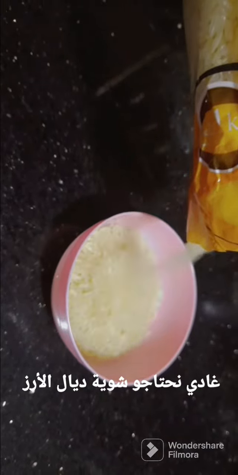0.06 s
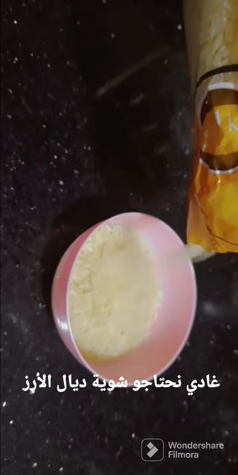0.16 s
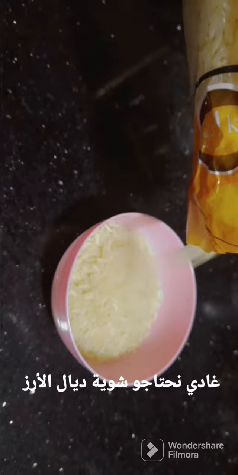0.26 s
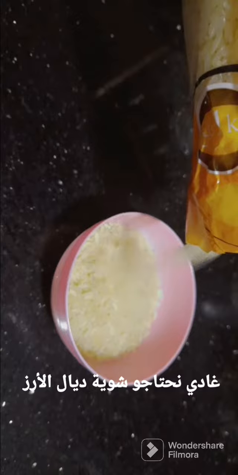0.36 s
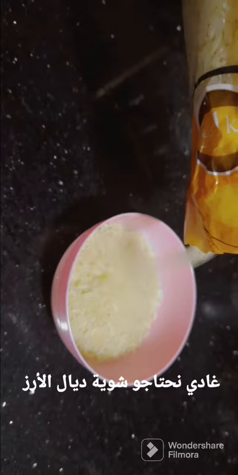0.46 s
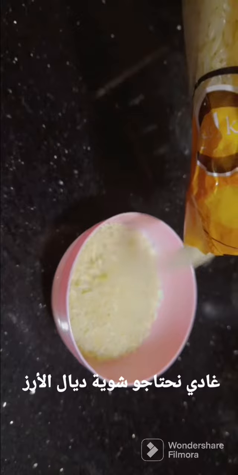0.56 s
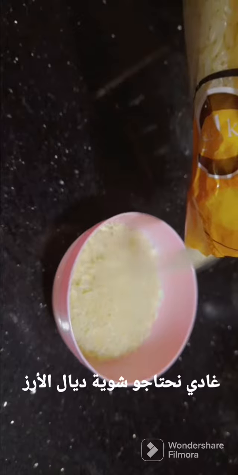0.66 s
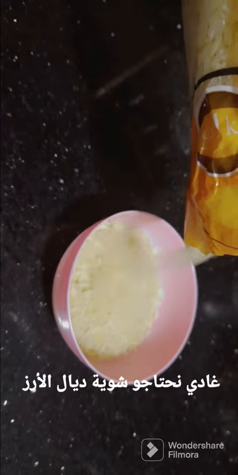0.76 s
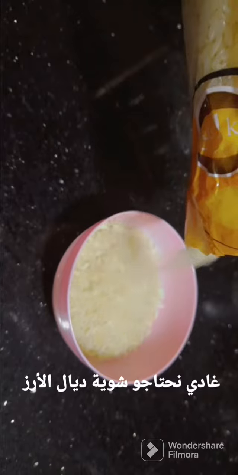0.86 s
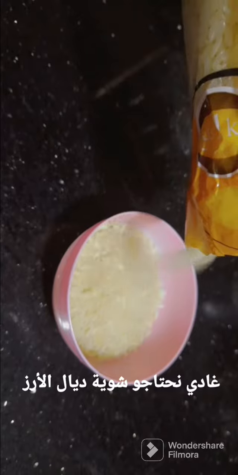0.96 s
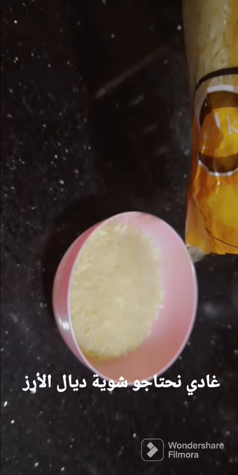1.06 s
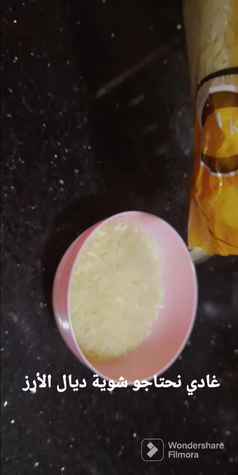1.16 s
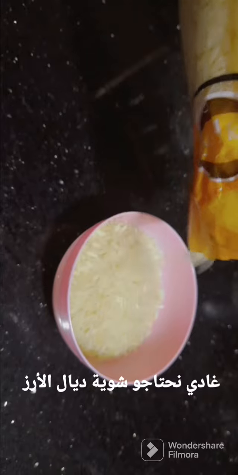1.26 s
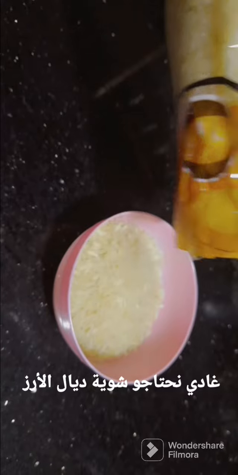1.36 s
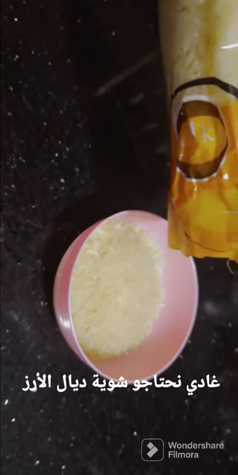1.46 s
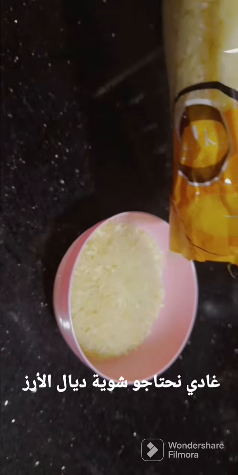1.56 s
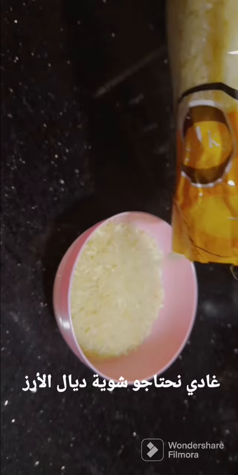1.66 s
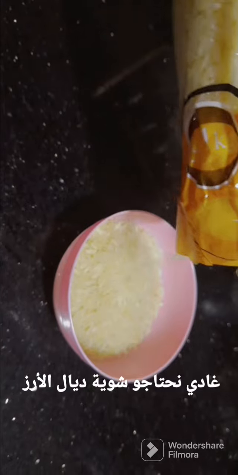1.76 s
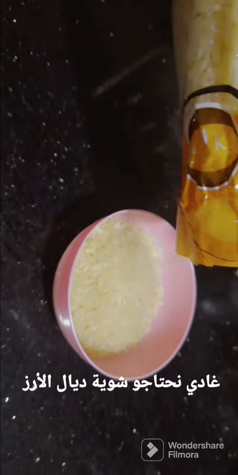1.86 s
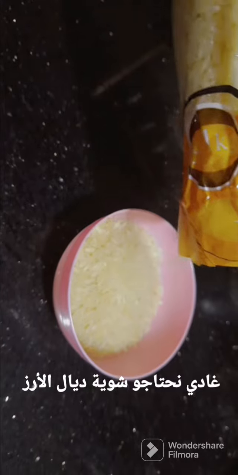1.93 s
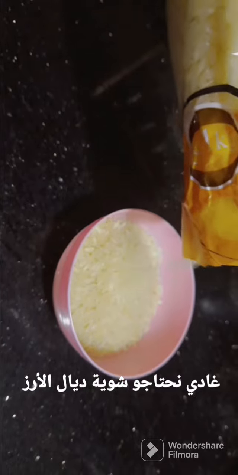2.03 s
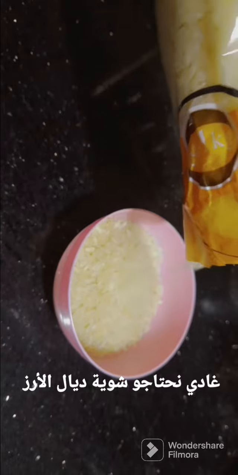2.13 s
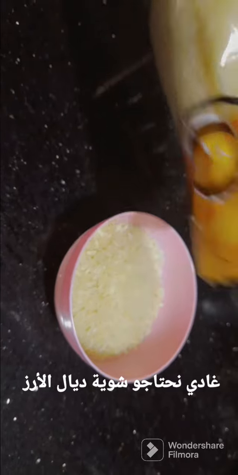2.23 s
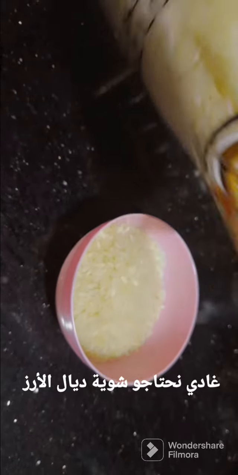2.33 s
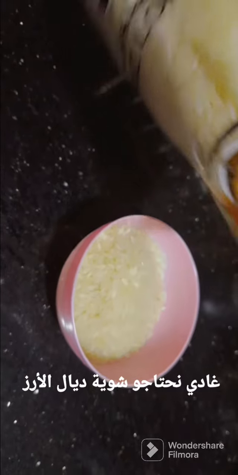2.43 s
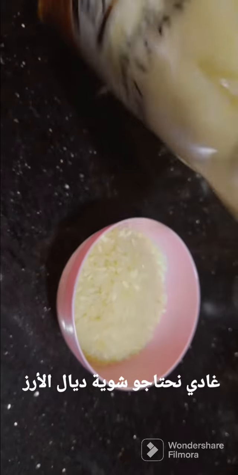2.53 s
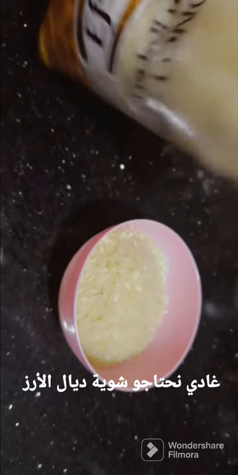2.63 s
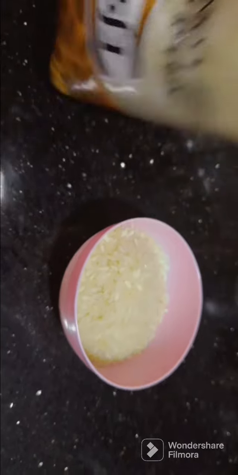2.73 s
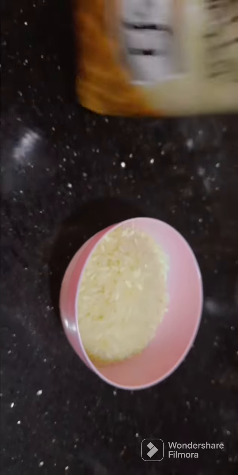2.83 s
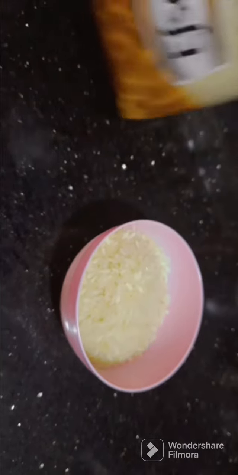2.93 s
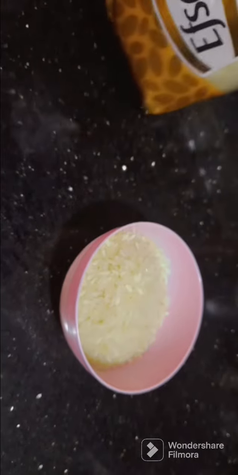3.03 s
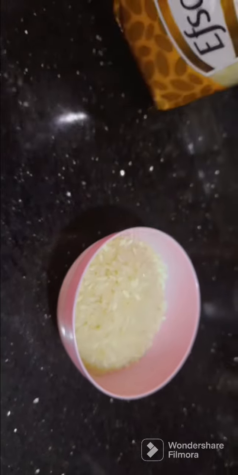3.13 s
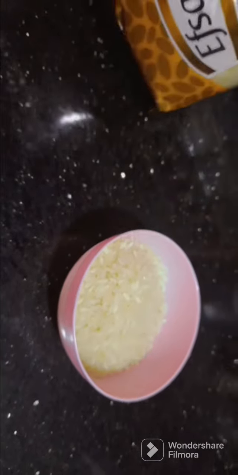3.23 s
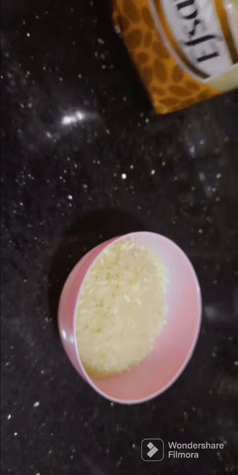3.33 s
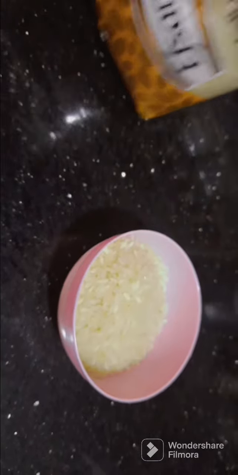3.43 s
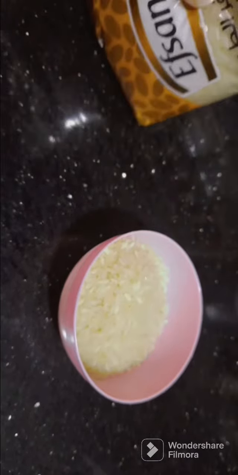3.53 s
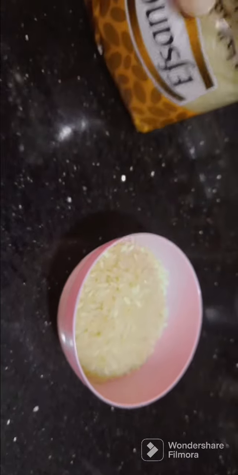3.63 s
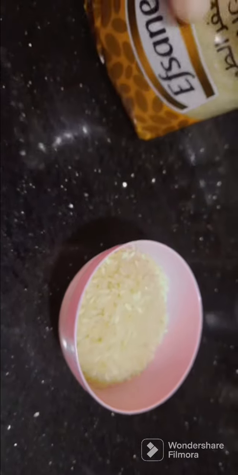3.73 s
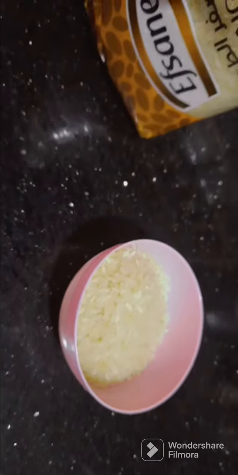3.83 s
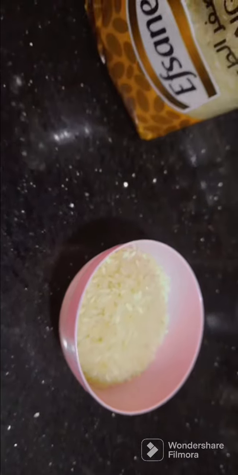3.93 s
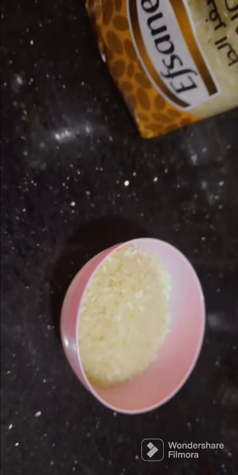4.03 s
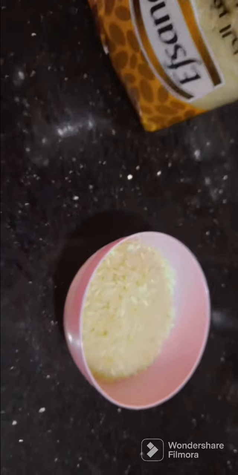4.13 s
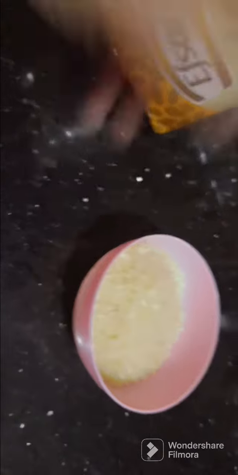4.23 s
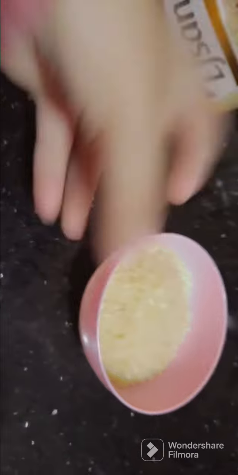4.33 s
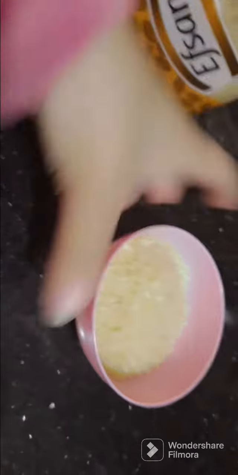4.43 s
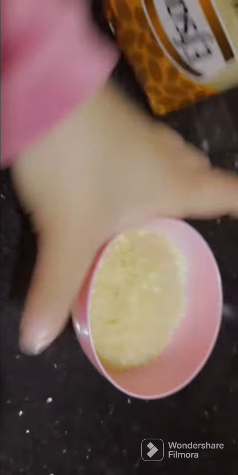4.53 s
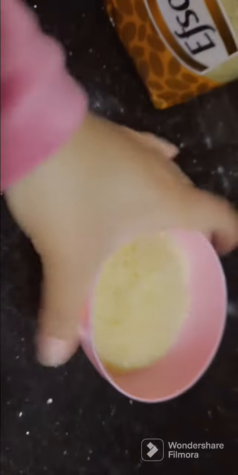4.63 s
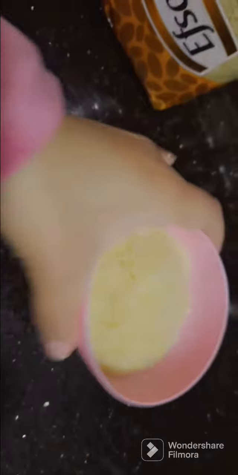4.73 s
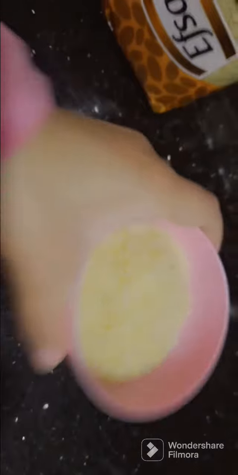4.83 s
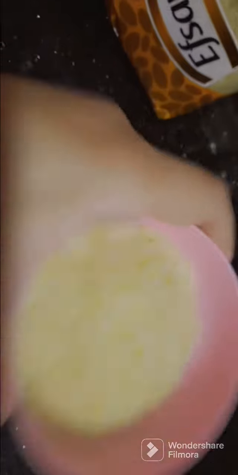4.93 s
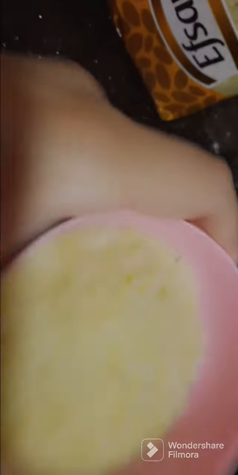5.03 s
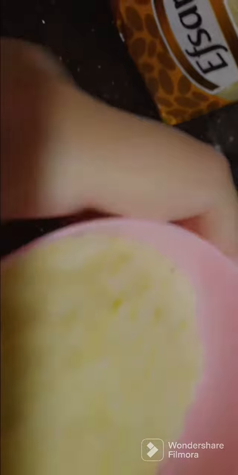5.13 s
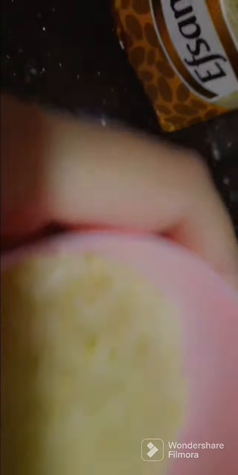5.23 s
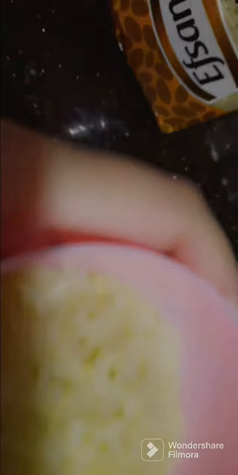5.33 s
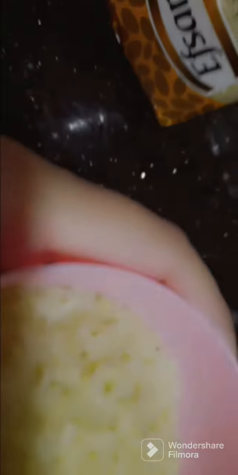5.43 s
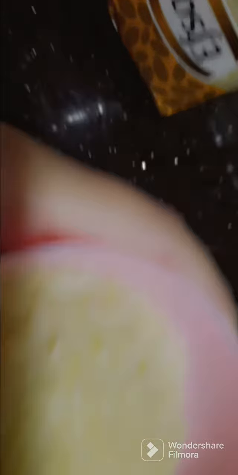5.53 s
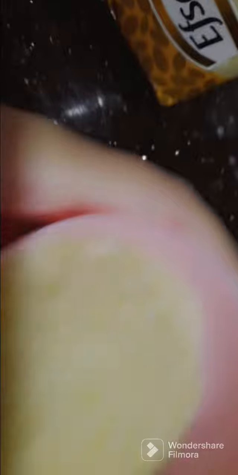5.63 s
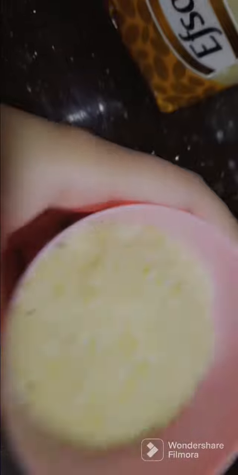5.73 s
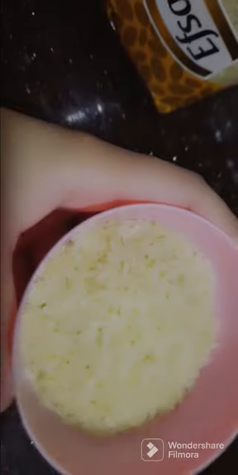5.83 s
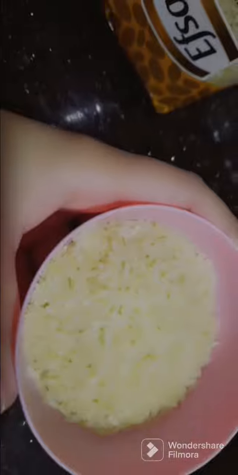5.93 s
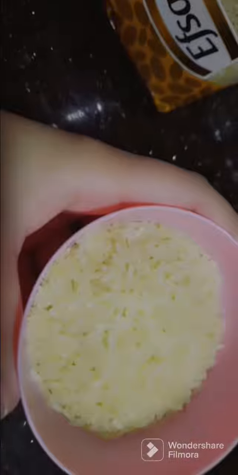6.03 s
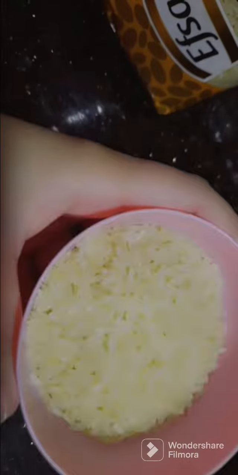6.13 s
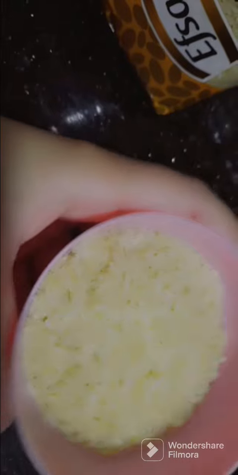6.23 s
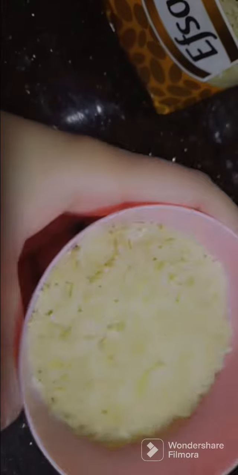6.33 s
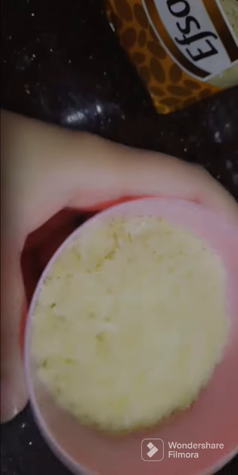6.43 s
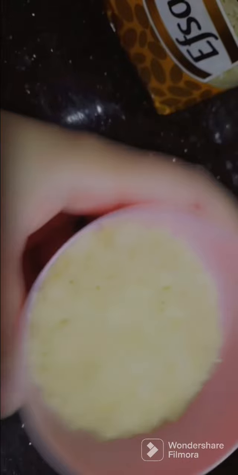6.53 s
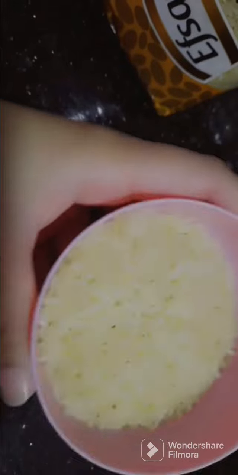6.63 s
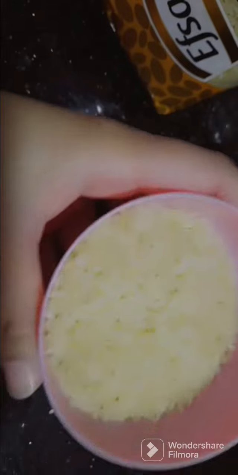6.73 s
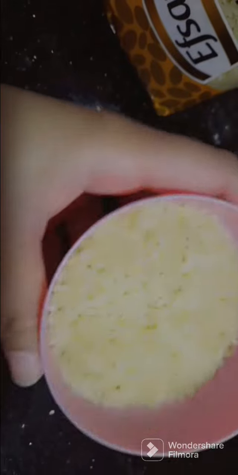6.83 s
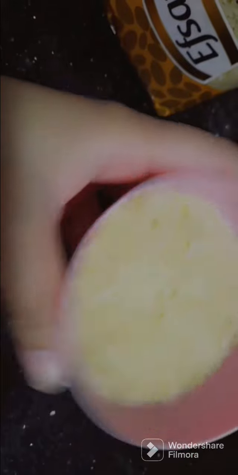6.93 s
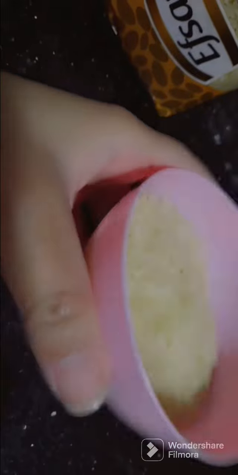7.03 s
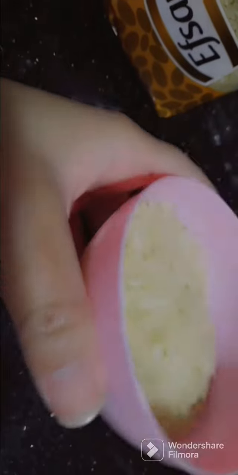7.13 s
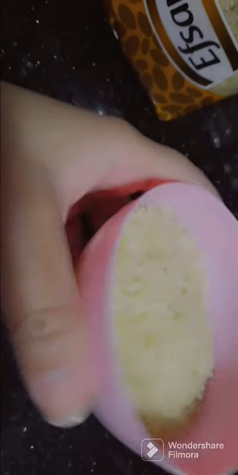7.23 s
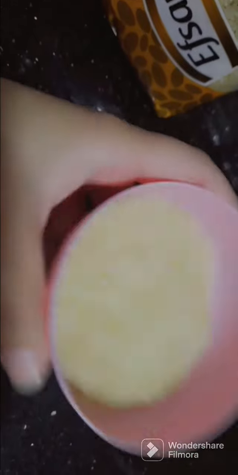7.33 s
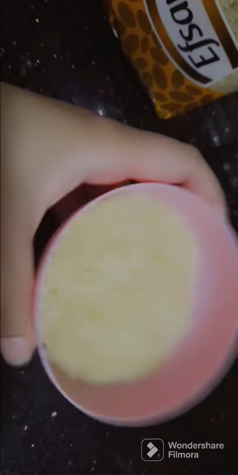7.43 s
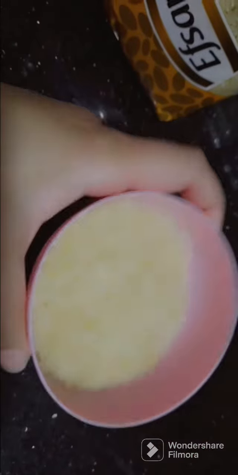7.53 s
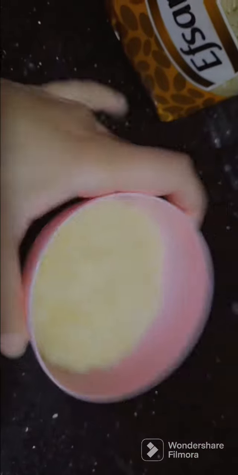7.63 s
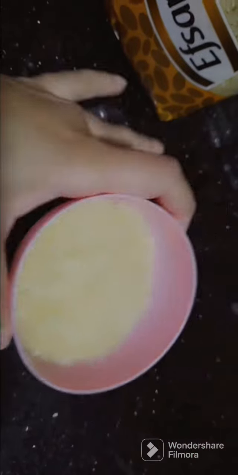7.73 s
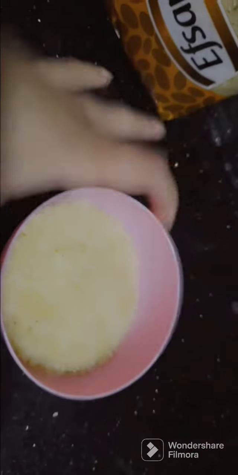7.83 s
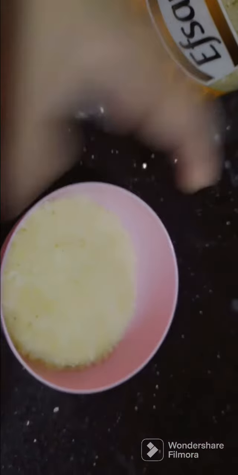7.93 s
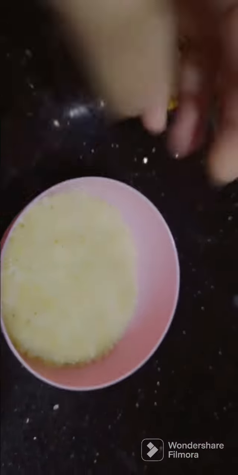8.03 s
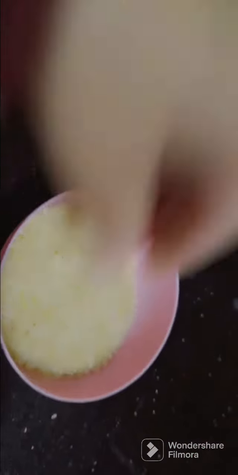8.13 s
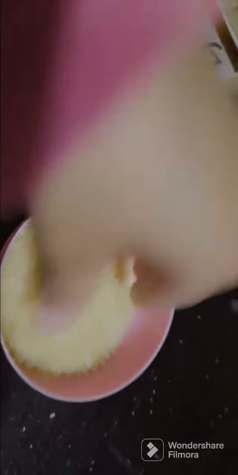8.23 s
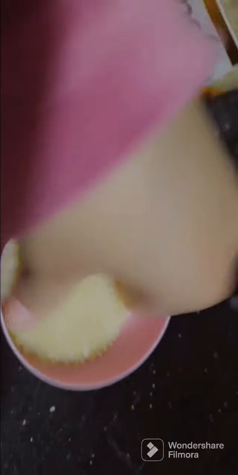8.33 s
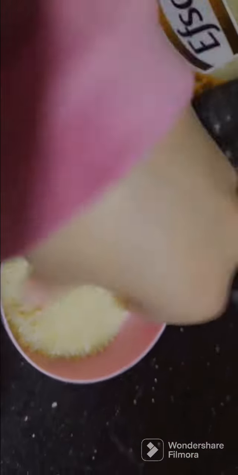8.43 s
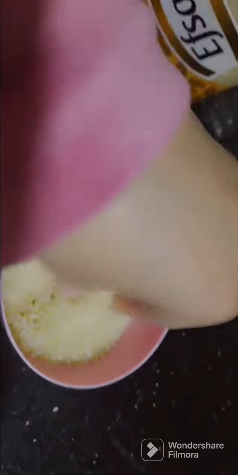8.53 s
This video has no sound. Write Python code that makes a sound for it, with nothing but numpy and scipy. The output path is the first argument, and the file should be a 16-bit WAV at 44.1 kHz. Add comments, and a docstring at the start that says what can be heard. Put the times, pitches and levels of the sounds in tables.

```python
"""Dry rice runs from a crinkling plastic bag into a plastic bowl on a stone counter: banded bursts of noise.
The bag smacks the rim, the stream thins to a trickle, then the rice slides back in the upright bag.
The bag is set down with sharp smacks: smeared pushes as cracks, damped modes as thumps.
A hand rocks the bowl so that the grains shift, puts it down on ringing modes and digs in.
Throughout, close to a phone, a small kitchen rumbles and faintly whines in filtered noise."""
import sys
import numpy as np
from scipy import signal
from scipy.fft import rfft, irfft
from scipy.io import wavfile

SR = 44100
rng = np.random.default_rng(int(sys.argv[2]) if len(sys.argv) > 2 else 0)


def log_audio(samples):
    """Write samples as a 16-bit WAV file to the path given in sys.argv[1]."""
    # one column per channel
    frames = np.atleast_2d(samples).T
    # limit to full scale, then quantise
    limited = np.clip(frames, -1, 1)
    pcm = np.round(limited * 32767).astype(np.int16)
    wavfile.write(sys.argv[1], SR, pcm)


N = 377937
T = np.arange(N) / SR
TOP_HZ = 15900  # upper limit of the phone


def undb(db):
    """Decibels to gain."""
    return 10 ** (np.asarray(db) / 20)


def unit(x):
    """Scale to rms 1."""
    return x / np.sqrt(np.mean(x ** 2))


def peak(x):
    """Scale to peak 1."""
    return x / np.abs(x).max()


def add(out, s, x):
    """Mix x into out from time s."""
    i = max(int(s * SR), 0)
    out[i:i + len(x)] += x[:N - i]


def colour(x, points, size=2048):
    """Causal minimum-phase filter through (Hz, dB) points, built from its cepstrum."""
    hz, db = np.transpose(points)
    f = np.maximum(np.fft.rfftfreq(size, 1 / SR), 1)
    skirt_db = -12 * np.maximum(np.log2(hz[0] / f), 0)  # 12 dB per octave below the first point
    response_db = np.interp(np.log(f), np.log(hz), db) + skirt_db
    cepstrum = irfft(np.log(undb(response_db)))
    # fold the cepstrum onto positive time, so that the filter never rings ahead
    cepstrum[1:size // 2] *= 2
    cepstrum[size // 2 + 1:] = 0
    impulse = irfft(np.exp(rfft(cepstrum)))
    return signal.fftconvolve(x, impulse)[:len(x)]


def band(x, lo_hz, hi_hz, order=2):
    """Butterworth band-pass."""
    edges_hz = [max(lo_hz, 10), min(hi_hz, SR / 2 - 100)]
    return signal.sosfilt(signal.butter(order, edges_hz, "band", fs=SR, output="sos"), x)


def swell(s, rise_s, fall_s):
    """A small avalanche: grows exponentially up to time s, then dies away."""
    return np.exp(-np.maximum((s - T) / rise_s, (T - s) / fall_s))


def flow(points):
    """Gain along a (s, dB) curve, silent outside it."""
    return undb(np.interp(T, *np.transpose(points), left=-np.inf, right=-np.inf))


def push(lo_hz, hi_hz, length_s, size=16384):
    """A soft push that swells and fades in one wavering resonance."""
    t = T[:size]
    return band(rng.standard_normal(size), lo_hz, hi_hz) * t / length_s * np.exp(-t / length_s)


def contact(width_hz, count=20, size=2048):
    """A sharp push, smeared over a millisecond or two as bending waves spread (all-pass sections)."""
    angle = 2 * np.pi * TOP_HZ * (np.arange(count) + rng.random(count)) / count / SR
    radius = np.exp(-np.pi * width_hz * (.5 + rng.random(count)) / SR)
    a1, a2, one = -2 * radius * np.cos(angle), radius ** 2, np.ones(count)
    allpass = np.column_stack([a2, a1, one, one, a1, a2])
    return signal.sosfilt(allpass, signal.unit_impulse(size))


def modes(table, size=8192):
    """Damped modes, each detuned a little differently at every blow."""
    t = T[:size]
    detune = 1 + .012 * rng.standard_normal(len(table))
    out = np.zeros(size)
    for (hz, db, t60), ratio in zip(table, detune):
        out += undb(db - 60 * t / t60) * np.sin(2 * np.pi * hz * ratio * t)
    return out


def blow(crack, crack_db, body, body_db, thump, thump_db):
    """A hard crack, a short ring and a hollow thump."""
    out = undb(thump_db) * peak(modes(thump))
    add(out, 0, undb(body_db) * peak(body))
    add(out, 0, undb(crack_db) * peak(colour(contact(width_hz=285), crack)))
    return band(out, 150, 20000)


# edges of the registers in which grains sound: (frequency [Hz])
REGISTER_EDGES = [100, 1400, 2800, 5000, 9000, 17000]


def grains(rate, spread_db, decay_s, broad):
    """Random collisions, many small and a few large; part sound in all registers at once, the rest in one each."""
    def collisions():
        """Energy of sparse hits of random size, rate a second, each dying away exponentially."""
        size = undb(spread_db * np.minimum(rng.exponential(size=N), 4))
        hits = (rng.random(N) < rate / SR) * size ** 2 / rate
        energy = signal.lfilter([1], [1, -np.exp(-2 / (decay_s * SR))], hits + 1e-18)
        return energy / energy.mean()

    shared = collisions()
    out = np.zeros(N)
    for lo, hi in zip(REGISTER_EDGES, REGISTER_EDGES[1:]):
        energy = broad * shared + (1 - broad) * collisions()
        out += band(rng.standard_normal(N) * np.sqrt(energy), lo, hi)
    return unit(out)


# spectrum of the room rumble: (frequency [Hz], relative level [dB])
RUMBLE_COLOUR = [(25, -25), (40, -6.5), (55, 1), (95, 2.5), (190, -11), (320, -2), (480, -16), (700, -24),
                 (1050, -26), (1550, -19), (2400, -18.5), (3200, -36), (6000, -29.5), (8400, -19.5),
                 (9800, -37.5), (16000, -33.5)]
# faint appliance whine: (centre [Hz], width [Hz], level before drift and waver [dB])
WHINE_BANDS = [(2030, 170, -73.5), (4758, 330, -91), (7250, 530, -83), (14450, 1100, -86.5)]
# drift of the whine as the phone moves about: (time [s], level offset [dB])
WHINE_DRIFT = [(0, -5), (2.4, 2), (4.2, 0), (5.2, 4.5), (6.2, 2.5), (6.9, 2), (7.35, 4), (7.7, 4.5),
               (8.56, -0.5)]
RUMBLE_DB = -69.5


def kitchen():
    """Low room rumble under a few narrow, wavering bands of whine."""
    out = unit(colour(rng.standard_normal(N), RUMBLE_COLOUR, size=8192)) * undb(RUMBLE_DB)
    drift_db = np.interp(T, *np.transpose(WHINE_DRIFT))
    for hz, width_hz, db in WHINE_BANDS:
        waver_db = 2.4 * np.interp(T, np.linspace(0, T[-1], num=40), rng.standard_normal(size=40))
        whine = unit(band(rng.standard_normal(N), hz - width_hz / 2, hz + width_hz / 2))
        out += undb(db + drift_db + waver_db) * whine
    return out


ROOM_T60_S, ROOM_LOW_T60_S = 0.28, 0.36


def room(x, size=20000):
    """Dense reflections of a small kitchen, as decaying noise; the low notes stay longest."""
    t = T[:size]
    high = band(rng.standard_normal(size), 200, 17000) * undb(-60 * t / ROOM_T60_S)
    low = band(rng.standard_normal(size), 280, 540) * undb(-60 * t / ROOM_LOW_T60_S)
    tail = (high + undb(-2) * low) * np.clip(t / 0.0015, 0, 1)
    return signal.fftconvolve(x, tail / np.linalg.norm(tail))[:N]


# dull bumps and thuds of handling: (time [s], level before an 11 dB cut [dB], pitch [Hz])
HANDLING_BUMPS = [(0.409, -54, 178), (0.791, -57.5, 290), (1.219, -56, 324), (1.594, -59, 322),
                  (2.402, -60, 302), (2.53, -60, 316), (3.374, -58, 550), (3.41, -52, 138),
                  (3.421, -48, 64), (4.385, -61, 326), (4.976, -56.5, 334), (5.14, -62.5, 330),
                  (5.1, -62, 71.3), (5.57, -64, 280), (5.783, -55.5, 334), (7.03, -51, 308),
                  (7.682, -43.5, 310), (7.701, -50.5, 154), (7.849, -50, 88), (8.068, -50.5, 323)]


def bumps():
    """Soft pushes of handling, each in one low resonance."""
    out = np.zeros(N)
    for s, db, hz in HANDLING_BUMPS:
        thud = push(hz * .93 - 10, hz * 1.1 + 10, length_s=.034)
        add(out, s, undb(db - 11.0) * unit(thud))
    return out


# bright spectrum of a grain's click: (frequency [Hz], relative level [dB])
GRAIN_COLOUR = [(2000, -73), (4000, -28.5), (5500, -12.5), (6800, -5), (8200, 1), (9600, -13), (11000, -13),
                (12500, -7.5), (16000, -12.5)]


def snap(mid_db, mid_hz, count=4, size=4096):
    """A sharp contact on plastic with a brief midrange ring; it settles with a few smaller clicks."""
    force = contact(width_hz=530)
    burst = rng.standard_normal(len(force)) * np.exp(-T[:len(force)] / 0.0013)
    ring = band(burst, mid_hz * 0.76, mid_hz * 1.46, order=3)
    out = np.zeros(size)
    add(out, 0, peak(unit(colour(force, GRAIN_COLOUR)) + undb(mid_db) * unit(ring)))
    # the later clicks come 1.5 to 18 ms behind
    for delay_s, drop_db in rng.uniform([.0015, 9], [.018, 19], (count, 2)):
        click = peak(colour(contact(width_hz=1800), GRAIN_COLOUR))
        add(out, delay_s, undb(-drop_db - max(mid_db, 0)) * click)
    return out


# single grains striking plastic: (time [s], level before a 1.5 dB lift [dB])
GRAIN_CLICKS = [(.0044, -22.5), (.0748, -28), (0.1584, -27), (0.2243, -27.5), (.2412, -29), (.4892, -26),
                (0.4935, -25.5), (.509, -38), (.618, -27), (0.6914, -25), (0.9105, -20.5), (1.0403, -25),
                (1.0863, -30), (1.0983, -29.5), (1.2204, -22.5), (1.303, -34.5), (1.317, -31.5),
                (1.38, -35), (1.4663, -38), (1.4886, -37), (1.713, -31), (1.915, -27.5), (2.1938, -33.5),
                (2.2812, -37.5), (5.1108, -40.5), (5.1765, -41.5), (5.9007, -48), (6.4209, -37),
                (6.566, -26), (6.6214, -28), (6.9716, -26.5), (7.0273, -30), (7.055, -26.5), (7.4062, -36),
                (7.5324, -42), (7.7051, -27.5)]
# plastic crackling as it flexes: (time [s], level before a 1.5 dB lift [dB], pitch [Hz])
FILM_CRACKLES = [(0.5895, -35, 3740), (0.7894, -32.5, 3680), (1.0035, -38.5, 2610), (1.1097, -33.5, 2580),
                 (1.1647, -34.5, 2780), (1.253, -35, 2970), (1.929, -36, 2720), (2.1414, -44, 2180),
                 (2.406, -48, 2300), (2.427, -48, 1920), (2.5053, -49, 2960), (2.756, -41, 2410),
                 (3.096, -25.5, 2270), (3.1122, -29, 2400), (3.34, -53.5, 2310), (4.048, -57, 2020),
                 (5.5123, -56, 2300), (5.5937, -45, 1920)]
CLICK_MID_DB, CLICK_MID_HZ = -29.5, 2070  # the plastic answers faintly in the midrange
CRACKLE_MID_DB = 4  # midrange ring over the bright click


def snaps():
    """Bright clicks of single grains and lower crackles of flexing plastic."""
    out = np.zeros(N)
    for s, db in GRAIN_CLICKS:
        add(out, s, undb(db) * snap(CLICK_MID_DB, CLICK_MID_HZ))
    for s, db, hz in FILM_CRACKLES:
        add(out, s, undb(db) * snap(CRACKLE_MID_DB, hz))
    return out * undb(1.5)


# grains tumbling in the bowl, under the stream and as the hand moves it; levels before a 1.5 dB cut:
# (time of the peak [s], click level [dB], rub on the wall [dB], rise [s], fall [s])
BOWL_TUMBLES = [(.008, -36, -50, 0.013, 0.023), (.152, -38, -62, .006, .015),
                (4.66, -65.5, -70.5, 0.04, 0.054), (5.019, -67.5, -78, 0.11, 0.06),
                (5.28, -84, -76, .018, 0.027), (5.62, -71, -78, 0.023, .1),
                (6.415, -48.5, -76, .025, 0.014), (6.553, -29.5, -44, .02, 0.028),
                (6.628, -43.5, -58, .008, 0.024), (6.735, -66, -82, 0.0067, 0.038),
                (6.974, -43.5, -67, 0.016, 0.074), (7.065, -47.5, -66.5, 0.042, .035),
                (7.528, -45, -57, 0.014, 0.023), (7.70, -58, -46, 0.0086, 0.04),
                (7.864, -50, -48, 0.0075, 0.02), (8.311, -47.5, -60, 0.011, 0.023),
                (8.42, -72, -63.5, .1, 0.12)]
# spectrum of grains rubbing on the wall: (frequency [Hz], relative level [dB])
WALL_COLOUR = [(500, -18), (900, -10.5), (1300, 5.5), (1900, 5), (3000, 1), (4500, 7.5), (7000, -1)]


def shift():
    """Tumbling grains click over each other and rub along the bowl's wall."""
    click_gain, rub_gain = np.zeros(N), np.zeros(N)
    for s, click_db, rub_db, rise_s, fall_s in BOWL_TUMBLES:
        motion = swell(s, rise_s, fall_s)
        click_gain += undb(click_db) * motion
        rub_gain += undb(rub_db) * motion
    clicks = unit(colour(grains(rate=700, spread_db=4.0, decay_s=0.0011, broad=0.92), GRAIN_COLOUR))
    rub = unit(colour(grains(rate=9000, spread_db=7, decay_s=0.001, broad=0.69), WALL_COLOUR))
    return (clicks * click_gain + rub * rub_gain) * undb(-1.5)


# the bowl set down on the counter, levels before the band-pass of the blow:
# (time [s], crack [dB], ring [dB], thump [dB])
BOWL_LANDINGS = [(7.6808, -27, -29, -37.5), (7.8534, -12.5, -38, -31.5), (7.8558, -12, -53, -45),
                 (7.8855, -11.5, -17.5, -25.5)]
# ring of the bowl: (frequency before detuning [Hz], relative level [dB], 60 dB decay [s])
BOWL_RING = [(523, -1.5, 0.017), (810, -8, 0.019), (1300, -7, 0.019), (1790, 5.5, 0.018), (2110, 1, 0.014),
             (2235, -8, 0.026), (3570, 4, 0.0077)]
# thump of the bowl: (frequency before detuning [Hz], relative level [dB], 60 dB decay [s])
BOWL_THUMP = [(171.5, -0.5, 0.21), (311, -3.5, 0.19), (336, 9, 0.032)]
# spectrum of the crack: (frequency [Hz], relative level [dB])
BOWL_CRACK_COLOUR = [(400, -13.5), (2000, -7.5), (3800, -17), (5500, -4), (7000, -1), (8300, 4.5),
                     (9700, -11), (12500, -4), (16000, -5.5)]
JOLT_DB, JOLT_S = -3.5, 0.0031  # the rice jumps at each knock: level against the ring, decay


def bowl_knocks(size=8192):
    """The bowl touches the stone with one edge, then drops flat; its load rattles and blurs the ring."""
    out = np.zeros(N)
    for s, crack_db, ring_db, thump_db in BOWL_LANDINGS:
        jolt = band(rng.standard_normal(size) * np.exp(-T[:size] / JOLT_S), 250, 2400)
        body = peak(modes(BOWL_RING, size=size)) + undb(JOLT_DB) * peak(jolt)
        add(out, s, blow(BOWL_CRACK_COLOUR, crack_db, body, ring_db, BOWL_THUMP, thump_db))
    return out


# the bag smacking the bowl's rim, then the counter; all but the slap pass the blow's band-pass:
# (time [s], crack [dB], body [dB], thump [dB], slap of the slack film [dB], slap pitch [Hz])
BAG_SMACKS = [(0.4273, -25, -23.5, -39, -33, 710), (0.4397, -19, -19.5, -35.5, -35.5, 836),
              (3.4105, -31, -42.5, -46, -44, 520), (3.587, -16, -18.5, -40, -42.5, 600),
              (3.6207, -22.5, -23, -38, -41, 600), (3.662, -37.5, -29, -33, -32.5, 526),
              (3.682, -35.5, -26, -35, -32.5, 774), (3.719, -32, -30.5, -37.5, -39, 784),
              (3.7586, -10, -13, -27.5, -35.5, 500), (3.773, -1, -11.5, -18, -22, 499.4)]
# modes of the full bag: (frequency before detuning [Hz], relative level [dB], 60 dB decay [s])
BAG_MODES = [(190, -15, 0.075), (314.3, -1, 0.19), (344, 3.5, .055), (473, -16.5, 0.068)]
# spectrum of the body of a smack: (frequency [Hz], relative level [dB])
BAG_BODY_COLOUR = [(250, -11.5), (430, -2.5), (600, -4), (780, -7.5), (950, -1), (1100, -11), (1300, 3.5),
                   (1500, -9.5), (1750, -2.5), (2400, 0), (3200, -7.5), (5000, -26)]
# spectrum of the crack: (frequency [Hz], relative level [dB])
BAG_CRACK_COLOUR = [(800, -21), (2500, -17.5), (3300, -11.5), (4200, -9.5), (5400, -5.5), (6400, -5),
                    (7900, -4.5), (9600, -17.5), (12000, -13.5), (16000, -12.5)]


def bag_knocks():
    """The full bag lands: its film cracks and slaps, the packed rice thumps."""
    out = np.zeros(N)
    for s, crack_db, body_db, thump_db, slap_db, slap_hz in BAG_SMACKS:
        body = colour(contact(width_hz=550), BAG_BODY_COLOUR)
        add(out, s, blow(BAG_CRACK_COLOUR, crack_db, body, body_db, BAG_MODES, thump_db))
        slap = push(slap_hz * .85, slap_hz * 1.18, length_s=.0035)
        add(out, s, undb(slap_db) * peak(slap))
    return out


# flow of the rice sliding back as the bag is tipped upright: (time [s], level [dB])
SLIDE_CURVE = [(2.7, -70), (2.75, -50), (2.82, -46), (2.97, -28), (3.05, -31.5), (3.15, -40), (3.19, -58.5),
               (3.39, -78.5)]
# rice jolted inside the bag:
# (time of the peak [s], level [dB], treble against it before a 0.5 dB cut [dB], rise [s], fall [s])
BAG_JOLTS = [(1.625, -64.5, 0, 0.0049, 0.035), (1.86, -68, -8, 0.014, 0.018),
             (1.94, -57.5, -4, 0.02, 0.081), (2.14, -62.5, 8.5, 0.011, 0.016),
             (2.609, -61.5, -10, 0.016, .05), (2.998, -47, 18, 0.0059, 0.012),
             (3.415, -53.5, -7, 0.0033, .09), (3.61, -48.5, -11.5, 0.019, 0.14),
             (3.689, -42, -10.5, 0.03, 0.059)]
# spectrum of rice drumming on the film: (frequency [Hz], relative level [dB])
BAG_COLOUR = [(120, -21), (220, -20), (305, -2.5), (540, -10.5), (690, -8), (880, -12.5), (1500, -8.5),
              (2100, -2), (2750, -2), (3500, -9.5), (6900, -10), (10400, -23.5), (12300, -14.5),
              (16000, -14.5)]
SLIDE_TREBLE_DB = -13  # against the slide's level, before the same cut


def slide():
    """A mass of grains rushes down the inside of the bag and drums on the film; every jolt stirs it again."""
    gain = flow(SLIDE_CURVE)
    treble_gain = gain * undb(SLIDE_TREBLE_DB)
    for s, db, treble_db, rise_s, fall_s in BAG_JOLTS:
        jolt = undb(db) * swell(s, rise_s, fall_s)
        gain = gain + jolt
        treble_gain = treble_gain + jolt * undb(treble_db)
    rush = colour(grains(rate=1400, spread_db=3.6, decay_s=.0005, broad=.5), BAG_COLOUR)
    body = unit(band(rush, 100, 9000, order=4))
    treble = unit(band(rush, 9000, SR / 2, order=4))
    return body * gain + treble * treble_gain * undb(-0.5)


STRAY_DB, STRAY_SPREAD_DB = 20, 7.5  # loudest stray over the flow curve, and how far others fall below


def strays(count=40):
    """Now and then a grain bounces out of the stream against the bowl's wall, at a random pitch."""
    out = np.zeros(N)
    s, db = np.transpose(POUR_FLOW)
    for k, (place, size, spot) in enumerate(rng.random((count, 3))):
        at = s[-1] * (k + place) / count
        click = snap(mid_db=0.5, mid_hz=2000 * 2 ** spot)
        add(out, at, undb(np.interp(at, s, db) + STRAY_DB - STRAY_SPREAD_DB * size) * click)
    return out


# flow of the stream landing on the heap, dwindling to a trickle:
# (time [s], level before the patter's 1.5 dB cut [dB])
POUR_FLOW = [(0, -48), (.1, -51), (.41, -49), (.49, -45), (.6, -50), (.78, -48), (.92, -53.5), (1.12, -50),
             (1.22, -57.5), (1.48, -61.5), (1.57, -71.5), (1.85, -59.5), (2.1, -60.5), (2.24, -76)]
# spectrum of grains on the heap: (frequency [Hz], relative level [dB])
HEAP_COLOUR = [(200, -13), (320, -1), (540, -16.5), (850, -4.5), (1080, -11.5), (1280, -1), (1900, -2.5),
               (2550, -5), (3700, -1.5), (5000, -3.5), (8000, -3), (9700, -9.5), (13000, -7), (16000, -1)]


def pour():
    """Grains patter on the heap; the thinner the stream, the more single grains stand out."""
    stream = flow(POUR_FLOW)
    rate = 650 * (stream / stream.max() + 0.39)  # collisions a second
    patter = grains(rate, spread_db=3.8, decay_s=.001, broad=.45)
    return unit(colour(patter, HEAP_COLOUR)) * stream * undb(-1.5)


def scene():
    """All sources, close up, with the room behind them."""
    rice = pour() + slide() + shift()
    ticks = snaps() + strays()
    bag, bowl = bag_knocks(), bowl_knocks()
    # each source's send into the room
    send = rice * undb(-12.5) + ticks * undb(-7.0) + bag * undb(-8.5) + bowl * undb(-7)
    return (rice + ticks + bag + bowl + bumps() + room(send) + kitchen())[None]


def record(dry):
    """The phone cuts the top with a steep elliptic low-pass."""
    return signal.sosfilt(signal.ellip(10, .2, 80, TOP_HZ, fs=SR, output="sos"), dry)


dry = scene()
out = record(dry)
log_audio(out)
```